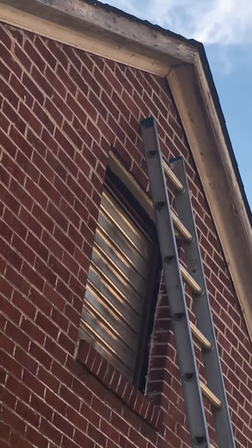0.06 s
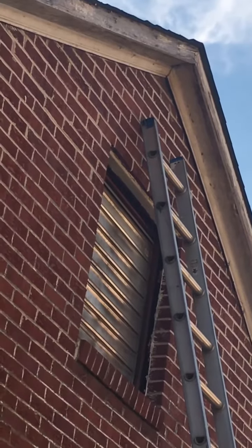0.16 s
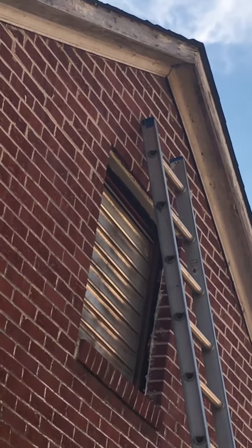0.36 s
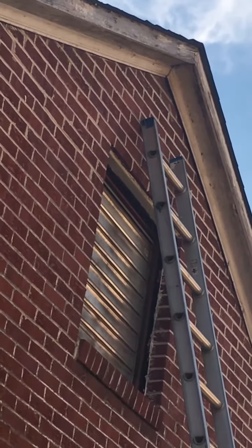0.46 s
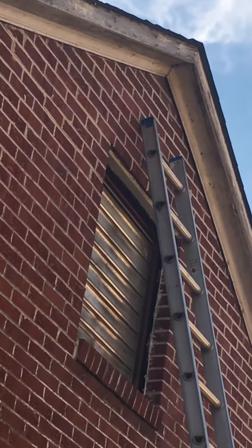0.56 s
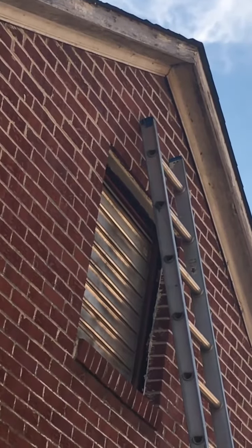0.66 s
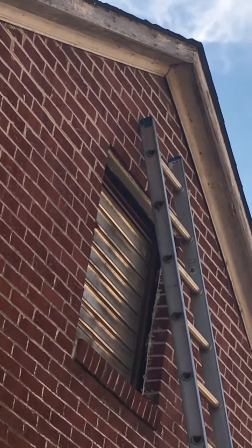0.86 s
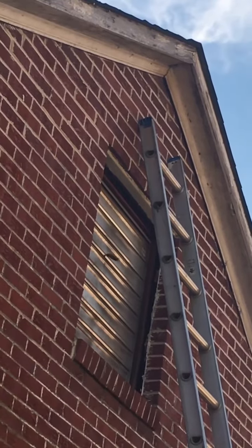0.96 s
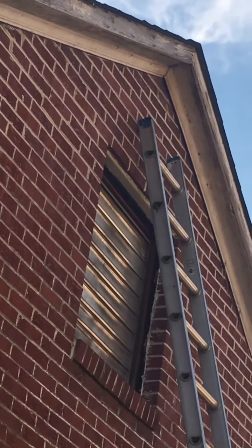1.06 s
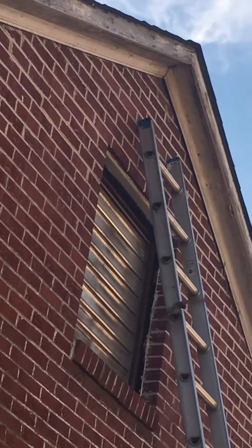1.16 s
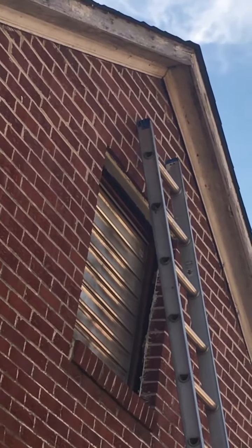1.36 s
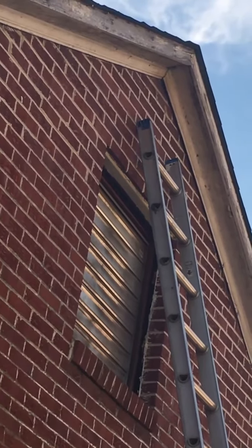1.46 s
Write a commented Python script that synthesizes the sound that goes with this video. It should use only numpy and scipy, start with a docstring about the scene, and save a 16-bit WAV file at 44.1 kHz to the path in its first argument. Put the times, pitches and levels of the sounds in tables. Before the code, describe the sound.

High, raspy bat squeaks and clicks over a low outdoor rumble, with an early microphone knock.

```python
"""Bats squabble behind a louvred vent in a brick gable: high, buzzy falling squeaks and click rattles.
A squeak is a whistle chopped into pulses; a rattle is the same voice slowed to separate clicks.
The building echoes each call. Early on something bumps the microphone, once hard, a few times softly.
Far birds whistle faintly over a low outdoor rumble."""
import sys
import numpy as np
from scipy import signal
from scipy.fft import rfft, irfft, next_fast_len
from scipy.io import wavfile
from scipy.ndimage import map_coordinates

SR = 44100
rng = np.random.default_rng(int(sys.argv[2]) if len(sys.argv) > 2 else 0)


def unload_wav(signal):
    """Save mono or channel-first audio to the path in sys.argv[1] as 16-bit WAV at rate SR, clipped to [-1, 1]."""
    wavfile.write(
        sys.argv[1],
        SR,
        np.round(np.clip(np.atleast_2d(signal).T, -1, 1) * 32767).astype(np.int16),
    )


N = 66150
TIME_S = np.arange(N) / SR


def amp(db):
    """Decibels to gain."""
    return 10 ** (np.asarray(db) / 20)


def unit_rms(x):
    """Scale to rms 1."""
    return x / np.sqrt(np.mean(x ** 2) + 1e-20)


def eq_gain(points, hz):
    """Gain at hz from (Hz, dB) points on a log frequency axis."""
    point_hz, point_db = np.transpose(points)
    return amp(np.interp(np.log(hz + 1), np.log(point_hz + 1), point_db))


def wobble(knots_per_s):
    """Smooth random curve."""
    return map_coordinates(rng.standard_normal(N), [TIME_S * knots_per_s], mode="wrap")


def filtered(x, response):
    """Apply a complex frequency response."""
    size = next_fast_len(N + SR // 2)
    return irfft(rfft(x, size) * response(np.fft.rfftfreq(size, 1 / SR)), size)[:N]


def contour(rows, edge_s):
    """On-off gate, then a per-sample curve for each column after the time."""
    times, *columns = np.transpose(rows)
    gate = np.clip(np.minimum(TIME_S - times[0], times[-1] - TIME_S) / edge_s + .5, 0, 1)
    return [gate] + [np.interp(TIME_S, times, column) for column in columns]


def phase(hz):
    """Running phase in radians."""
    return 2 * np.pi * np.cumsum(hz) / SR


# Noise spectra. Each row: frequency in Hz, relative density in dB.
RUMBLE_SPECTRUM = [(25, -13), (65, 1.5), (100, 2.5), (160, -1.5), (300, -12), (500, -21), (700, -20),
                   (1250, -17.5), (2300, -21.5), (2800, -29.5), (4300, -31.5), (5200, -34.5), (7000, -33.5),
                   (10000, -67)]
HISS_SPECTRUM = [(5000, -26), (8500, 6), (12500, -1), (16000, -2.5)]
# Rumble swell. Each row: time in seconds, rms level in dB.
RUMBLE_SWELL = [(0, -44.5), (.2, -46), (.38, -48), (.6, -45.5), (.82, -45), (1.1, -46)]


def background(hiss_db=-65.5):
    """Slowly swelling outdoor rumble and a faint steady hiss."""
    def noise(spectrum):
        return unit_rms(filtered(rng.standard_normal(N), lambda hz: eq_gain(spectrum, hz)))

    rumble_db = np.interp(TIME_S, *np.transpose(RUMBLE_SWELL))
    return amp(rumble_db) * noise(RUMBLE_SPECTRUM) + amp(hiss_db) * noise(HISS_SPECTRUM)


# Bird notes, one list each. Each row: time in seconds, pitch in Hz, rms level in dB.
BIRD_NOTES = [
    [(0, 4590, -61.5), (.045, 4080, -74)],
    [(.43, 4650, -68), (.51, 4810, -72), (.585, 4220, -60)],
    [(.55, 4560, -70), (.62, 4520, -64), (.70, 3940, -69)],
    [(1.115, 4700, -76), (1.13, 4720, -64), (1.15, 4050, -73), (1.165, 3820, -74)],
    [(1.21, 4720, -66), (1.26, 4500, -66)],
    [(1.21, 3850, -70), (1.35, 4560, -73), (1.395, 4470, -66.5), (1.435, 3850, -66.5)],
]


def birds():
    """Thin, wavering whistles, far away."""
    out = np.zeros(N)
    for rows in BIRD_NOTES:
        gate, hz, db = contour(rows, edge_s=.01)
        envelope = gate * amp(db + wobble(77.9))
        out += envelope * np.sqrt(2) * np.sin(phase(hz * (1 + .0065 * wobble(300))))
    return out


# Knocks. Each row: start in seconds, peak in dB before the case rings, low cut in Hz, high cut in Hz.
MIC_KNOCKS = [(0.018, -35, 23, 245), (0.1118, -35, 110, 1500), (0.1146, -31, 36, 900),
              (.142, -32, 130, 890), (0.2258, -4.5, 11, 9000), (0.2431, -42, 23, 129),
              (.327, -37.5, 190, 600)]
# Knock spectrum. Each row: frequency in Hz, relative level in dB.
KNOCK_SPECTRUM = [(20, -14), (45, 1), (190, 11), (610, 7), (1220, -2), (2100, -10.5), (2900, -26.5),
                  (3600, -27.5), (6000, -70)]
# Case resonances. Each row: centre in Hz, width in Hz, gain in dB.
CASE_MODES = [(413, 55, -15), (1070, 240, -6)]


def mic_bumps(lag_cycles=.655):
    """Dull knocks on the microphone: lows trail highs and the case rings briefly."""
    def case_response(hz):
        return 1 + sum(amp(db) * 1j * hz * width / (centre ** 2 - hz ** 2 + 1j * hz * width)
                       for centre, width, db in CASE_MODES)

    out = np.zeros(N)
    for start_s, db, low_hz, high_hz in MIC_KNOCKS:
        def knock_response(hz):
            band = hz ** 2 / (hz ** 2 + low_hz ** 2) / (1 + (hz / high_hz) ** 2)
            delay_cycles = hz * start_s + lag_cycles * np.log(hz + 1)
            return eq_gain(KNOCK_SPECTRUM, hz) * band * np.exp(-2j * np.pi * delay_cycles)

        knock = filtered(np.ones(1), knock_response)
        out += amp(db) * knock / abs(knock).max()
    return filtered(out, case_response)


# Echoes off the building. Each row: delay in seconds, level in dB before the EQ.
WALL_ECHOES = [(.0011, -19), (.018, -20), (.0297, -16)]
# EQ of echoes and tail. Each row: frequency in Hz, gain in dB.
ECHO_EQ = [(2000, 5.5), (10000, 4), (15500, -4.5)]


def building_echoes(calls, smear_s=.0008, tail_gain_db=-11, tail_t60_s=.21):
    """Echoes smeared by louvres and rough brick, plus a short tail, all duller than the call."""
    t = np.arange(SR // 3) / SR

    def scatter(envelope):
        return unit_rms(rng.standard_normal(len(t)) * envelope) / np.sqrt(len(t))

    tail_envelope = amp(-60 * t / tail_t60_s) * (1 - np.exp(-t / .0014))
    impulse_response = amp(tail_gain_db) * scatter(tail_envelope)
    for delay_s, db in WALL_ECHOES:
        impulse_response += amp(db) * scatter((t >= delay_s) * np.exp(-abs(t - delay_s) / smear_s))
    echoes = signal.fftconvolve(calls, impulse_response)[:N]
    return filtered(echoes, lambda hz: eq_gain(ECHO_EQ, hz))


def colony_chatter(count=60, centre_hz=13200, length_s=.014, level_db=-55, scatter_db=2):
    """Faint, hoarse falling squeaks at random from deeper in the roost."""
    pitch_spread, pitch_fall = .16, .14
    out = np.zeros(N)
    hoarseness = wobble(3200)
    for slot, (shift, tune, size) in enumerate(rng.uniform(-1, 1, (count, 3))):
        start_s = (slot + shift) * TIME_S[-1] / count
        progress = np.clip((TIME_S - start_s) / length_s, 0, 1)
        hz = centre_hz * (1 + pitch_spread * tune - pitch_fall * progress)
        out += amp(level_db + scatter_db * size) * np.sin(np.pi * progress) * np.sin(phase(hz))
    return out * hoarseness


# Call undertones. Each row: start in seconds, length in seconds, mid pitch in Hz, level in dB.
UNDERTONES = [(0.495, 0.025, 1907, -43.5), (0.685, 0.042, 1778, -46.5), (0.793, 0.0457, 1446, -48.5),
              (1.411, 0.048, 1248, -53.5)]


def bat_undertones(pitch_fall=.1, roughness=.035, octave_db=-18):
    """Hoarse falling notes near the calls' buzz rate, each with its octave."""
    out = np.zeros(N)
    for start_s, length_s, hz, db in UNDERTONES:
        progress = np.clip((TIME_S - start_s) / length_s, 0, 1)
        angle = phase(hz * (1 - pitch_fall * (progress - .5) + roughness * wobble(400)))
        tone = np.sin(angle) + amp(octave_db) * np.sin(2 * angle)
        out += amp(db) * np.sin(np.pi * progress) * tone
    return out


# Rattles, the shortest a single click.
# Each row: start in seconds, length in seconds, initial clicks per second, initial level in dB.
BAT_RATTLES = [ (.0806, .011, 226, -29.5), (0.19, 0.016, 390, -24.5), (0.2077, .006, 230, -28),
               (0.3163, .009, 260, -23.5), (0.603, 0.018, 426, -24), (0.93, 0.018, 380, -35.5),
               (1.0594, 0.015, 160, -35), (1.0803, .032, 430, -36), (1.2235, 0.014, 380, -35),
               (1.2423, 0.0096, 450, -31), (1.261, .002, 200, -30), (1.2682, 0.0055, 360, -33), ]


def bat_rattles(click_hz=12380, scatter_hz=350, click_s=.00015, fade_db=.5, shimmer_db=1.4):
    """The bat's voice slowed to separate clicks, each a few cycles long; the gaps tend to widen."""
    gap_growth, gap_scatter = .22, .16
    out = np.zeros(N)
    for start_s, length_s, clicks_per_s, first_db in BAT_RATTLES:
        age_s = 0
        for gap, size, tune in rng.standard_normal((32, 3)):
            if age_s > length_s:
                break
            progress = age_s / length_s
            near = abs(TIME_S - start_s - age_s) < 4 * click_s
            t = TIME_S[near] - start_s - age_s
            click = np.exp(-(t / click_s) ** 2) * np.sin(2 * np.pi * (click_hz + scatter_hz * tune) * t)
            out[near] += amp(first_db - fade_db * progress + shimmer_db * size) * click
            age_s += (1 + gap_growth * progress) * np.exp(gap_scatter * gap) / clicks_per_s
    return out


# Squeaks, one list each.
# Each row: time in seconds, pitch in Hz, relative level in dB, buzz sharpness (0 = no pulsing).
BAT_SQUEAKS = [
    [(.0285, 15800, -35, .6), (.031, 11800, -35, 0.42), (.034, 8300, -39.5, 0.66)],
    [(.140, 11200, -38, 1.08), (.153, 11450, -35, 1.27), (.170, 9700, -38.5, 0.44), (.178, 7800, -48, 0.72)],
    [(.273, 11740, -29.5, 0.54), (.279, 10800, -35.5, 0.41), (.284, 10000, -48, 0.82),
     (.293, 8830, -40, 0.43)],
    [(.294, 15500, -42, 0.19), (.302, 12000, -49, 0.54), (.306, 10550, -39.5, 0.72),
     (.312, 8600, -39, 0.29)],
    [(.456, 16100, -53, .7), (.472, 13200, -51, .8)],
    [(.592, 12200, -44, .3), (.600, 13800, -32, 0.32)],
    [(.671, 16000, -44, .2), (.673, 12900, -35.5, 0.16), (.677, 10800, -41, 0.34)],
    [(.690, 15700, -46, .2), (.699, 15200, -45, 0.18), (.706, 15700, -49, .2)],
    [(.709, 15600, -46, 0.33), (.714, 14000, -29.5, 0.66), (.718, 12480, -32.5, 0.94),
     (.724, 12000, -29.5, 0.36), (.728, 10300, -48, 1)],
    [(.797, 15540, -39, 1.25), (.804, 14000, -36.5, 2.2), (.814, 13200, -40, 2), (.830, 10300, -40.5, 0.88),
     (.834, 8500, -40, 0.29)],
    [(.836, 11300, -42, 0.55), (.844, 9880, -49.5, 1.3), (.857, 11330, -41, 1.7)],
    [(.866, 11900, -43, 1.3), (.875, 11300, -40, 1.1), (.881, 10000, -48, 1)],
    [(.952, 12330, -37, 2), (.962, 10950, -36.5, 0.89), (.968, 9170, -38.5, .4), (.971, 8300, -41, 0.24)],
    [(1.150, 16500, -42, 0.11), (1.153, 14600, -41, 0.24), (1.157, 10300, -35, .5),
     (1.162, 9330, -32.5, 0.12), (1.167, 8200, -48, 0.36)],
    [(1.351, 14200, -50, 0.33), (1.360, 13300, -52, .4)],
    [(1.412, 14400, -35, 1.2), (1.419, 11400, -31, 1.05), (1.428, 10500, -43, 1.5),
     (1.436, 11770, -39, 1.44), (1.443, 10300, -32.5, 0.53), (1.448, 9400, -33.5, 0.27),
     (1.452, 7870, -47, 0.77)],
]


def bat_squeaks(cycles_per_pulse=9.4, pulse_skew=.73, bend_depth=.7, gain_db=-.5):
    """A gliding, raspy whistle chopped into pulses at a fraction of its pitch; each bends the pitch up."""
    out = np.zeros(N)
    rate_jitter = 1 + .13 * wobble(700)
    shimmer_db = .6 * wobble(900)
    pitch_waver = 1 + .01986 * wobble(260)
    rasp = .41 * (wobble(1900) + 1j * wobble(1900))
    for rows in BAT_SQUEAKS:
        gate, hz, db, sharpness = contour(rows, edge_s=.0008)
        buzz_hz = hz / cycles_per_pulse * rate_jitter
        buzz_phase = phase(buzz_hz)
        pulses = np.exp(sharpness * np.cos(buzz_phase + pulse_skew * np.cos(buzz_phase)))
        sounding = gate > 0
        pulses[sounding] /= np.sqrt(np.i0(2 * sharpness[sounding]))  # rms near 1 at any sharpness
        bend_hz = bend_depth * sharpness * buzz_hz * (np.cos(buzz_phase) - np.tanh(sharpness))
        whistle = np.real((1 + rasp) * np.exp(1j * phase(hz * pitch_waver + bend_hz)))
        out += gate * amp(db + shimmer_db) * pulses * whistle
    return amp(gain_db) * out


def scene():
    """Bats and birds with their echoes, plus bumps and background; mono."""
    calls = bat_squeaks() + bat_rattles() + colony_chatter() + bat_undertones() + birds()
    return (calls + building_echoes(calls) + mic_bumps() + background())[None]


def record(dry):
    """Steep low-pass band limit."""
    cutoff_hz = 16000
    return filtered(dry[0], lambda hz: 1 / (1 + (hz / cutoff_hz) ** 200))[None]


dry = scene()
out = record(dry)
unload_wav(out)
```